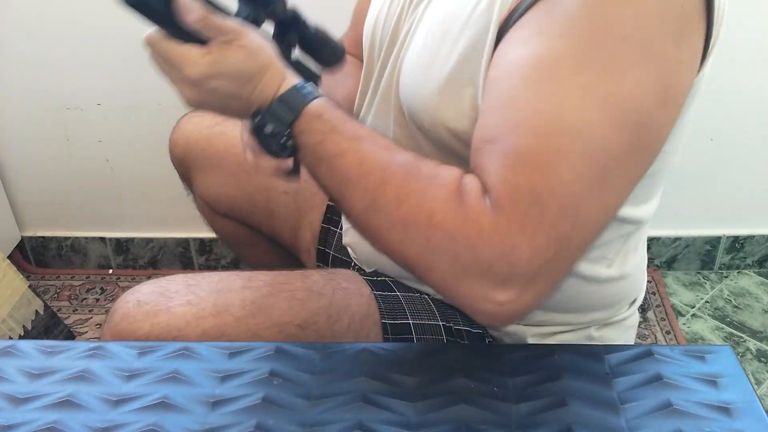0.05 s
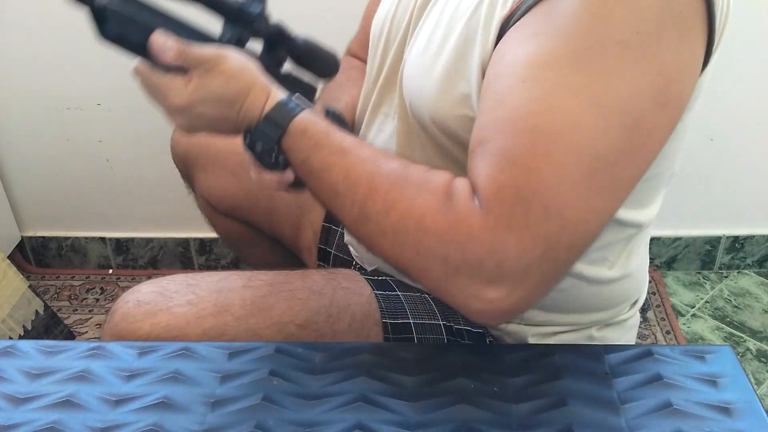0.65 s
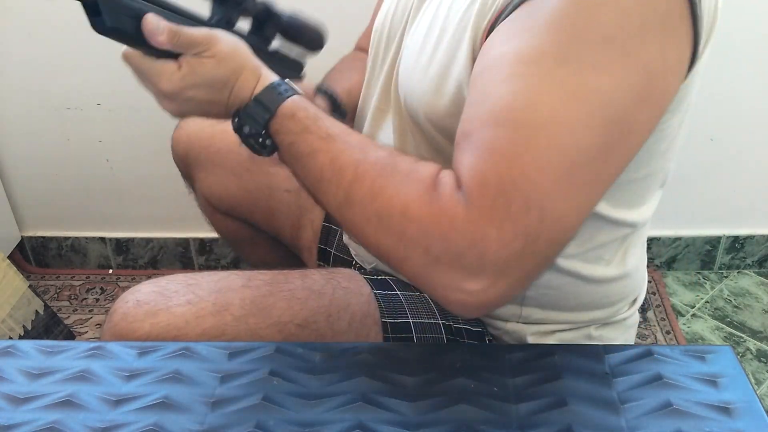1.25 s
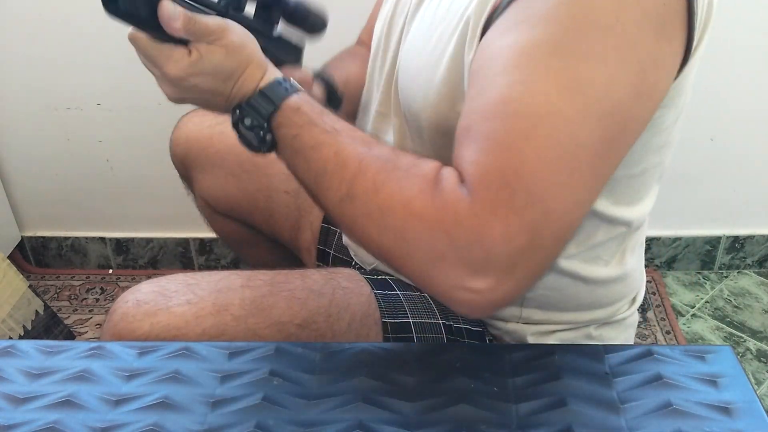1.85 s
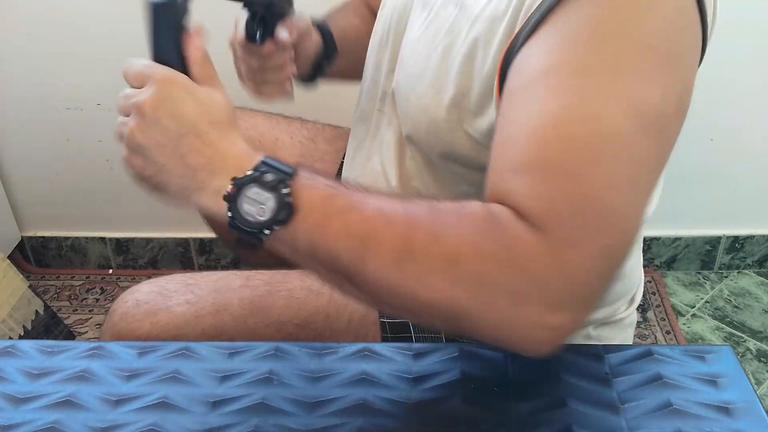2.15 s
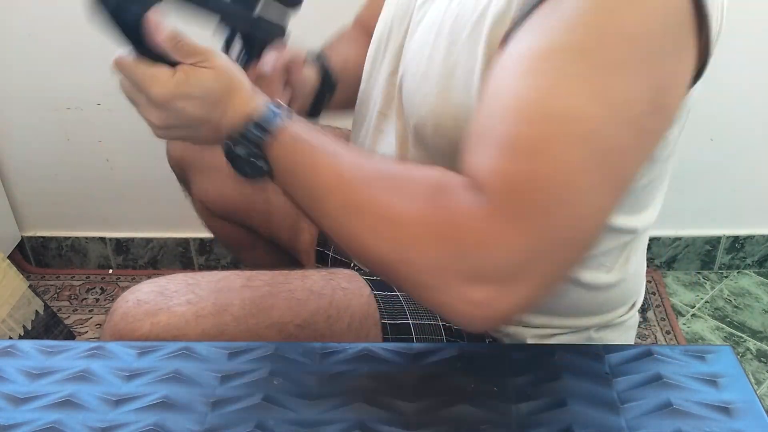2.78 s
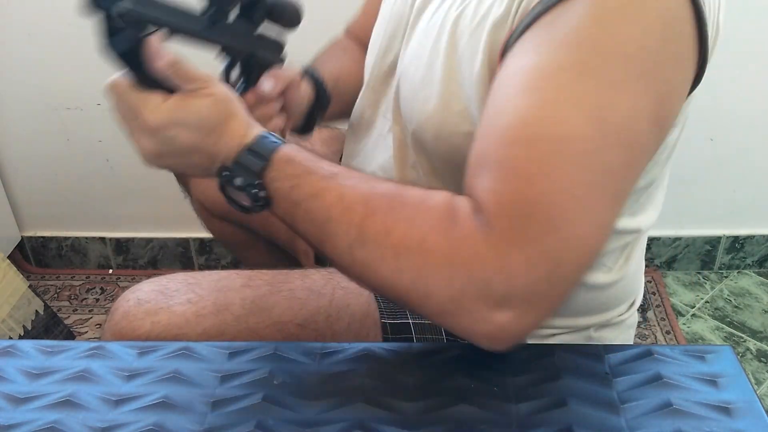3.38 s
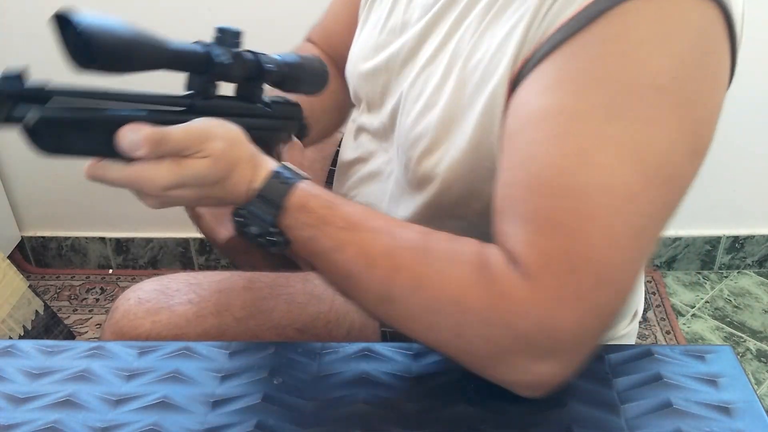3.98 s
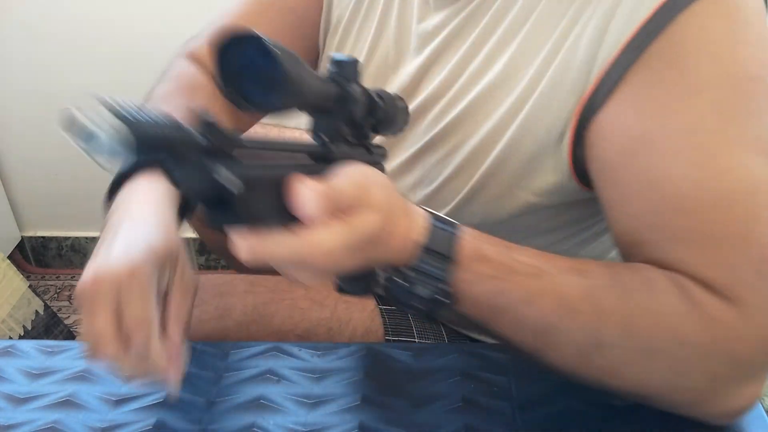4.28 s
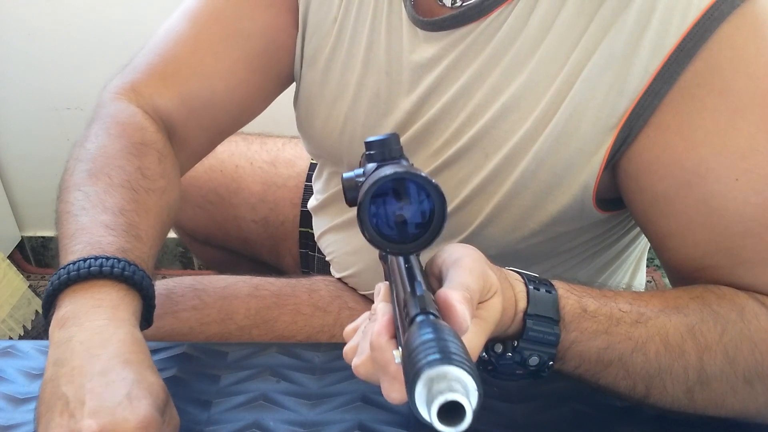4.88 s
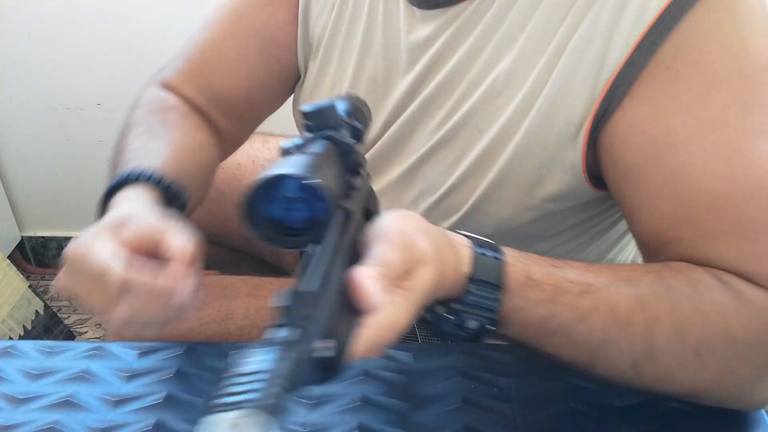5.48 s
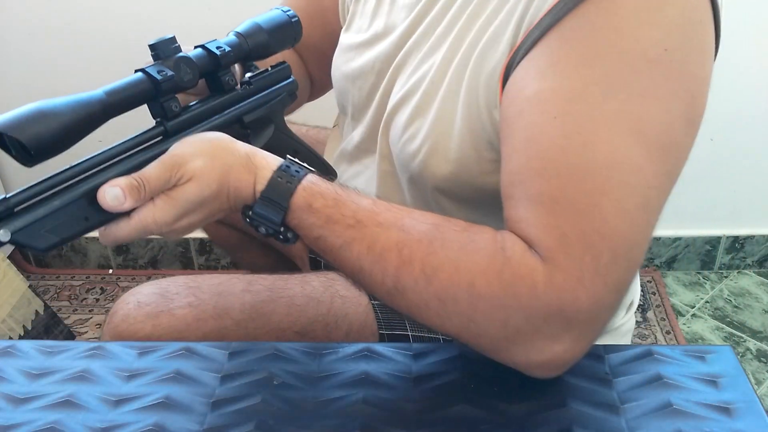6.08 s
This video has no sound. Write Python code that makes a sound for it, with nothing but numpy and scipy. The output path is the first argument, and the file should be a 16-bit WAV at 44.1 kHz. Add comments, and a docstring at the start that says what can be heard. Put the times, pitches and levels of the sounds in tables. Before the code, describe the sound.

The pump lever of an air pistol slams shut seven times, a little under twice a second, each clap sharp, airy and briefly ringing. Lighter metal clicks, faint squeaks and piston sliding fill the gaps, while a table wobbles with a low rumble. The pumping then stops, leaving soft hand bumps, dull grip knocks and cloth rustle. It is heard up close in a small, quiet room with short echoes.

```python
"""Pumping an air pistol

In a small, hard-walled room the pump lever slams shut seven times and swings out to its stop in between.
The valve pops before each slam, the joints click, the piston slides and the table wobbles. Then the
pistol is turned over in the hands, with soft bumps and rustling cloth. A limiter flattens the slams."""
import sys
import numpy as np
from scipy import signal
from scipy.fft import rfft, irfft, next_fast_len
from scipy.io import wavfile
from scipy.ndimage import uniform_filter1d, minimum_filter1d

SR = 44100
rng = np.random.default_rng(int(sys.argv[2]) if len(sys.argv) > 2 else 0)


def output_pcm(signal):
    """Save a mono or channel-first signal as 16-bit PCM at the path in sys.argv[1].

    Samples are clipped to [-1, 1] before scaling.
    """
    pcm = np.clip(np.atleast_2d(signal).T, -1, 1) * 32767
    wavfile.write(sys.argv[1], SR, np.round(pcm).astype(np.int16))


N = 275299
TIME = np.arange(N) / SR
AFTER = TIME[:SR]   # the second after a blow
CUTOFF_HZ = 14280
LEAD_S = .02   # parts scrape for this long before they hit

# The lever slams shut: time_s, level_db, tilt_db_per_octave, knock_db, slide_db, latch_db, wobble_db
SLAMS = [(0.1249, 2.5, 1.5, 2.5, -41, -38.5, -33), (.711, 1, 1, 1, -46, -18.5, -26.5),
         (1.2929, 2, 1, 2, -45, -24.5, -30.5), (1.852, 2, 1, 0, -41.5, -29, -29.5),
         (2.415, 1.5, 1, 2.5, -49.5, -24.5, -39), (2.9734, 1.5, 1, -4, -41, -29.5, -34.5),
         (3.6408, 0.5, 1, 1.5, -54.5, -39.5, -36)]
# The lever hits its open stop: time_s, level_db, tilt_db_per_octave, ring_db, scrape_db, wobble_db
STOPS = [(.427, -28, .5, -2.5, 6, -35.5), (1.028, -26, 1, -16, 1.5, -37.5),
         (1.571, -16, 1.13, -0.5, 1.5, -31), (2.157, -31, 4, -5.5, -8, -40),
         (2.7035, -17, 0.5, -0.5, -1, -35.5), (3.2577, -17, 0, -1.5, -19.5, -37.5)]
# The tone of a small click: pitch_hz, level_db
CLICK_COLOUR = [(100, -26), (450, -19.5), (1300, 0), (2600, 2), (4500, 0.5), (7000, 2), (10500, 6.5),
                (14000, 2.5)]


def amp(db):
    """Turn decibels into a gain."""
    return 10 ** (np.asarray(db) / 20)


def unit(x):
    """Scale a signal to an average power of 1."""
    return x / np.sqrt(np.mean(x ** 2) + 1e-20)


def fade(db, t60):
    """A gain that starts at db and drops 60 dB every t60 seconds."""
    return amp(db - 60 * AFTER / t60)


def onset(rise_s):
    """A gain that climbs smoothly from 0 to 1."""
    return 1 - np.exp(-AFTER / rise_s)


def mode(hz, t60):
    """One vibration that dies away."""
    return np.sin(2 * np.pi * hz * AFTER) * fade(0, t60)


def at_hz(points, hz):
    """Read between the points of a curve, with octaves evenly spaced."""
    known_hz, values = np.transpose(points)
    return np.interp(np.log(hz + 1), np.log(known_hz), values)


def add(track, s, sound):
    """Mix a sound in at s seconds."""
    start = max(0, round(s * SR))
    track[:, start:start + sound.shape[-1]] += sound[..., :N - start]


def in_band(x, hz, width_hz):
    """Keep one band of pitches; white noise keeps its power."""
    band = signal.butter(2, [hz - width_hz / 2, hz + width_hz / 2], "band", fs=SR, output="sos")
    return signal.sosfilt(band, x) * np.sqrt(SR / 2 / width_hz)


def colour(x, spectrum, tilt=0, peaks=()):
    """Shape the tone with a curve, a tilt (dB per octave above 500 Hz) and ringing peaks."""
    size = 2 * next_fast_len(x.shape[-1] // 2 + SR // 10)
    hz = np.arange(size // 2 + 1) * SR / size
    db = at_hz(spectrum, hz) + tilt * np.log2(np.maximum(hz, 500))
    for centre, width, boost in peaks:
        db = db + boost / (1 + (2 * (hz - centre) / width) ** 2)
    gain = amp(db) / np.sqrt(np.mean(amp(db[hz < CUTOFF_HZ]) ** 2))
    # Make the filter ring only after a hit, never before it (minimum phase).
    cepstrum = irfft(np.log(gain))
    cepstrum[1:size // 2] *= 2
    cepstrum[size // 2 + 1:] = 0
    return irfft(rfft(x, size) * np.exp(rfft(cepstrum)))[..., :x.shape[-1]]


def diffuse(size):
    """White noise from all around; left and right differ only in the treble."""
    # Stereo width: pitch_hz, side_to_mid_db
    width = [(100, -58), (2800, -64), (4200, -42.5), (5900, -12), (9000, -8), (13000, -9)]
    mid, side = rng.standard_normal((2, size))
    hz = np.arange(size // 2 + 1) * SR / size
    side = irfft(rfft(side) * amp(at_hz(width, hz)), size)
    return mid + side * [[1], [-1]]


def room_tail(late_db=-21, late_t60=0.58):
    """A fresh wash of echoes from the walls; each band dies at its own rate."""
    # How long the room rings: pitch_hz, t60_s
    decays = [(100, 0.14), (280, 0.28), (600, 0.35), (1400, 0.25), (3500, 0.31), (7000, 0.26), (13000, 0.2)]
    pitches, t60s = np.transpose(decays)
    spectrum = rfft(diffuse(SR))   # one bin per Hz
    late_power = fade(late_db, late_t60) ** 2
    out = 0
    for t60, weights in zip(t60s, np.eye(len(decays))):
        share = at_hz(list(zip(pitches, weights)), np.arange(SR // 2 + 1))
        out = out + irfft(spectrum * share, SR) * np.sqrt(fade(0, t60) ** 2 + late_power)
    return out


def blow(crack_db, crack_t60, scrape_db, scrape_t60, damping_db_per_s=0):
    """Parts scrape together for LEAD_S, crack as they meet, and the room answers."""
    until_hit_s = np.arange(round(LEAD_S * SR), 0, -1) / SR
    scrape = amp(scrape_db - 60 * until_hit_s / scrape_t60) * diffuse(len(until_hit_s))
    ring = fade(crack_db, crack_t60) * diffuse(SR) + room_tail()
    return np.hstack([scrape, ring * amp(-damping_db_per_s * AFTER)])


def struck(x, spectrum, tilt, peaks, uneven_db, count=220):
    """Each blow rings the many small resonances a little differently, the low ones most of all."""
    hz = np.geomspace(40, CUTOFF_HZ, count)
    scatter_db = uneven_db * rng.standard_normal(count) / (1 + (hz / 8000) ** 2)
    return colour(x, np.column_stack([hz, at_hz(spectrum, hz) + scatter_db]), tilt, peaks)


def swell(s, rise_db_per_s, fall_db_per_s, hold_s=0):
    """The gain of one motion: it rises to 1 at time s, holds and dies away."""
    before_s = np.maximum(s - TIME, 0)
    after_s = np.maximum(TIME - s - hold_s, 0)
    return amp(-rise_db_per_s * before_s - fall_db_per_s * after_s)


def friction(gain, spectrum, grain_db, grain_s):
    """Rubbing noise that catches and slips in small grains."""
    grains = np.tanh(unit(uniform_filter1d(rng.standard_normal(N), round(grain_s * SR))))
    return gain * colour(unit(diffuse(N) * amp(grain_db * grains)), spectrum)


def quiet_room(db=-61):
    """A faint, steady rumble and hiss."""
    # The tone of the background: pitch_hz, level_db
    tone = [(20, 2.5), (40, 0), (70, -8.5), (120, -11), (250, -22.5), (500, -27), (1200, -31.5),
            (5000, -39), (14000, -35.5)]
    return amp(db) * colour(diffuse(N), tone)


def arms():
    """Moving arms rub cloth on skin and make a low rumble."""
    # The pumping swing: before_slam_s, length_s, cloth_db, rumble_db
    swing = (0.24, 0.63, -50.5, -60.5)
    # Moves while the pistol is turned: start_s, length_s, cloth_db, rumble_db
    turns = [(3.93, 0.012, -48.5, -59), (4.048, 0.057, -55.5, -54.5), (4.576, .1, -55.5, -55.5),
             (4.704, .01, -54, -51), (4.82, 0.049, -62.5, -57.5), (5.017, 0.17, -67, -57.5),
             (5.51, 0.025, -66.5, -62), (5.679, 0.029, -67.5, -68), (5.882, 0.31, -71, -70)]
    # The tones of the cloth and the rumble: pitch_hz, level_db
    cloth_tone = [(60, -7), (300, -8), (600, -9.5), (1200, -11), (3000, -10), (5000, -9.5), (7500, 2),
                  (10500, 6.5), (12500, 5.5), (14000, -8.5)]
    rumble_tone = [(25, 0.5), (60, 6), (115, 3), (170, -12), (280, -5.5), (400, -12.5), (700, -23.5),
                   (2000, -37), (14000, -59)]
    swings = [(s - swing[0], *swing[1:]) for s, *_ in SLAMS[:-1]]
    cloth = rumble = 0
    for s, length_s, cloth_db, rumble_db in swings + turns:
        cloth += amp(cloth_db) * swell(s, rise_db_per_s=378.5, fall_db_per_s=150, hold_s=length_s)
        rumble += amp(rumble_db) * swell(s, rise_db_per_s=351, fall_db_per_s=142.5, hold_s=length_s)
    rustle = friction(cloth, cloth_tone, grain_db=3.5, grain_s=.009)
    return rustle + friction(rumble, rumble_tone, grain_db=6.5, grain_s=0.051)


def draught():
    """The first slam wafts air onto the microphone: a slow swing of pressure and a low flutter."""
    out = np.zeros((2, N))
    flutter = fade(db=-38, t60=0.5) * in_band(diffuse(SR), hz=75, width_hz=29)
    add(out, SLAMS[0][0], amp(-15) * mode(hz=11, t60=0.57) + flutter)
    return out


def table(wobble_hz=28.5, t60=0.65, delay_s=.005):
    """Each slam, stop and lean rocks the table on its legs and makes its top rumble."""
    # An arm leans on the table: start_s, wobble_db
    leans = [(4.02, -35), (4.58, -42.5), (5.01, -41), (5.84, -54.5)]
    out = np.zeros((2, N))
    low_band = signal.butter(2, [35, 130], "band", fs=SR, output="sos")
    for s, *_, db in SLAMS + STOPS + leans:
        rumble = fade(-26, t60) * unit(signal.sosfilt(low_band, rng.standard_normal(SR)))
        add(out, s + delay_s, amp(db + 4) * onset(0.018) * (mode(wobble_hz, t60) + rumble))
    return out


def faint_rings():
    """Faint, wavering tones swell and fade while the pistol is turned."""
    # The tones: start_s, level_db, pitch_hz, t60_s
    rings = [(5.11, -63, 651, 0.44), (5.67, -74, 4040, 0.67), (5.72, -70.5, 577, 0.52)]
    out = np.zeros((2, N))
    for s, db, hz, t60 in rings:
        tone = in_band(diffuse(SR), hz, width_hz=20 + 0.026 * hz)
        add(out, s, fade(db + 3.5, t60) * onset(0.034) ** 2 * tone)
    return out


def handling():
    """Hands and elbows make soft, padded bumps; the grip gives small dull knocks."""
    # Bumps: start_s, level_db, pitch_hz, t60_s
    bumps = [(3.985, -44, 353, 0.069), (4.026, -27.5, 105.2, 0.084), (4.545, -41, 160.7, 0.097),
             (4.603, -45.5, 84.5, 0.11), (4.709, -45, 117, 0.123), (4.793, -47, 365, 0.26),
             (5.502, -54, 160, 0.16), (5.539, -44, 1002, 0.037), (5.826, -53, 292, 0.077)]
    # Knocks of the grip in the hand: time_s, level_db, tilt_db_per_octave
    knocks = [(4.125, -56.5, -12.5), (4.612, -56.5, -4.5), (4.713, -52, -3), (4.794, -45.5, -5),
              (5.827, -57.5, -2)]
    # The tone of the grip: pitch_hz, level_db
    grip_tone = [(80, 4.5), (400, -6.5), (700, -12), (1200, -7), (2000, -1.5), (3000, -3.5), (4500, -25),
                 (14000, -41)]
    # Where the grip rings: pitch_hz, width_hz, boost_db
    grip_peaks = [(358, 85, 9.5), (724, 200, 15), (1195, 210, 5), (1920, 140, 4)]
    out = np.zeros((2, N))
    for s, db, hz, t60 in bumps:
        overtone = amp(-14) * min(1, 150 / hz) ** 2 * mode(2.4 * hz, t60)
        add(out, s, amp(db + 3.5) * (mode(hz, t60) + overtone) * onset(0.0043))
    for s, db, tilt in knocks:
        knock = blow(crack_db=0, crack_t60=0.12, scrape_db=-20, scrape_t60=0.027)
        add(out, s - LEAD_S, amp(db) * struck(knock, grip_tone, tilt, grip_peaks, uneven_db=2))
    return out


def hinge():
    """The hinge gives a short, dry scrape where a push starts slowly."""
    # Scrapes: start_s, level_db, pitch_hz
    scrapes = [(.046, -39.5, 2200), (3.44, -48, 2101)]
    out = np.zeros((2, N))
    for s, db, hz in scrapes:
        add(out, s, fade(db, t60=.3) * onset(0.003) * in_band(diffuse(SR), hz, width_hz=1100))
    return out


def piston_speed(push_lead_s=.065, pull_delay_s=.165, pull_db=-32):
    """The piston is pushed in before every slam and drawn out after all but the last."""
    pushes = sum(amp(slide_db) * swell(s - push_lead_s, rise_db_per_s=151.5, fall_db_per_s=60)
                 for s, *_, slide_db, _, _ in SLAMS)
    pulls = sum(swell(s + pull_delay_s, rise_db_per_s=170, fall_db_per_s=209.5) for s, *_ in SLAMS[:-1])
    return pushes + amp(pull_db) * pulls


def piston(speed):
    """The piston rubs as it slides, louder the faster it goes."""
    # The tone of the slide: pitch_hz, level_db
    tone = [(100, -17), (450, -27.5), (700, -5.5), (1000, 3), (1400, 3.5), (2000, 0.5), (2500, 6),
            (4200, -0.5), (6500, 2.5), (11000, -4.5), (14000, -11)]
    return friction(speed, tone, grain_db=7, grain_s=0.0039)


def rattle(speed, ticks_per_s=30):
    """Loose pins tick at random while the piston moves."""
    ticks = (rng.random(N) < ticks_per_s / SR) * rng.uniform(0.35, 1, N) * speed
    shape = (1 + fade(db=9, t60=0.015)) * amp(-90 * AFTER)
    tick = colour(room_tail() * shape, CLICK_COLOUR)
    return amp(-5.5) * signal.fftconvolve(ticks[None], tick, axes=1)[:, :N]


def seal(pitch_spread=0.027):
    """The seal squeaks late in each push and twice early in each pull, except on the slow last stroke."""
    # offset_from_slam_s, level_db, pitch_hz, width_hz
    squeaks = [(-.098, -44, 2350, 600), (.125, -37, 1400, 170), (.15, -37, 1400, 170)]
    out = np.zeros((2, N))
    for s, *_ in SLAMS[:-1]:
        for offset_s, db, hz, width_hz in squeaks:
            squeak = in_band(room_tail(), hz * (1 + pitch_spread * rng.standard_normal()), width_hz)
            add(out, s + offset_s, amp(db - 44 * AFTER) * squeak * onset(0.003))
    return out


def click(db, tilt, crack_db, hz):
    """A small part snaps, with a note of its own."""
    snap = blow(crack_db, crack_t60=0.027, scrape_db=0, scrape_t60=0.012, damping_db_per_s=45.5)
    return amp(db) * struck(snap, CLICK_COLOUR, tilt, [(hz, 0.15 * hz, 10)], uneven_db=3.5)


def valve(first_hz=1490, fall_hz_per_stroke=32):
    """The valve ticks and gives a short, hollow pop with an echo, a little lower on every stroke."""
    # Pops, mostly fainter as the pressure builds: start_s, level_db
    pops = [(.097, -22), (.687, -25), (1.268, -31.5), (1.828, -30.5), (2.396, -27.5), (2.946, -34.5),
            (3.617, -36)]
    out = np.zeros((2, N))
    for stroke, (s, db) in enumerate(pops):
        hz = first_hz - fall_hz_per_stroke * stroke
        pop = amp(8) * mode(hz, t60=.017) * onset(0.00016)
        echo = amp(0.5) * in_band(room_tail(), hz, width_hz=600)
        add(out, s, amp(db) * (pop + echo))
        add(out, s - LEAD_S, click(db - 10, tilt=-1.2, crack_db=4, hz=8500))
    return out


def open_stop(tilt, ring_db, scrape_db):
    """The lever drags briefly, then hits its open stop and its steel rings."""
    # The tone of the hit: pitch_hz, level_db
    tone = [(60, -6.5), (250, -18.5), (500, -17), (900, -8), (1500, -4), (2200, -1), (3700, 0.5),
            (4500, -4.5), (7000, -2), (10000, 2), (12000, 1), (14000, -4.5)]
    # Where the steel rings: pitch_hz, width_hz, boost_db (before scaling by ring_db)
    steel = [(1729, 230, 9.5), (2900, 72, 5), (6140, 240, 8.5), (9500, 250, 4.5), (9547, 210, 6.5),
             (10000, 320, 7.5)]
    peaks = [(hz, width, boost * amp(ring_db)) for hz, width, boost in steel]
    hit = blow(crack_db=6, crack_t60=0.18, scrape_db=scrape_db, scrape_t60=.022)
    return struck(hit, tone, tilt, peaks, uneven_db=4)


def slam(tilt, knock_db):
    """The lever claps onto the frame, air spits out, and the tube rings on."""
    # The tone of the clap: pitch_hz, level_db
    tone = [(40, -13), (120, -16.5), (190, -20), (245, -15.5), (330, -7.5), (430, -5.5), (650, 4.5),
            (900, 2), (1500, 4), (2800, 1), (3700, 1), (5200, 0), (6600, -3), (9200, 2.5), (12100, 1.5),
            (13000, -2.5), (14200, -10)]
    # Where the pistol's body rings: pitch_hz, width_hz, boost_db
    body = [(429, 40, 0.5), (551, 16, 0), (634, 30, -1.5), (659, 29, 3), (1000, 29, 1.5), (1100, 15, -2),
            (1390, 20, -0.5), (1440, 20, 3.5), (1611, 7.5, 3), (1750, 23, 5.5), (2200, 7.3, -1),
            (2357, 12, 5.5), (3180, 69, 1.5), (4200, 73, -1), (7535, 120, 3), (9100, 52, -4.5),
            (8760, 130, 6.5), (12400, 120, 8)]
    # The lasting ring of the stock and pump tube: pitch_hz, width_hz, level_db, t60_s
    tube = [(418, 48, -23, 0.17), (585.6, 30, -29, 0.37), (3380, 870, -18.5, 0.31),
            (4080, 760, -13.5, 0.31)]
    hollow_knock = (340, 210, knock_db)   # the stock's knock depends on how it is gripped
    clap = blow(crack_db=-11, crack_t60=0.062, scrape_db=-20, scrape_t60=0.011)
    out = struck(clap, tone, tilt, body + [hollow_knock], uneven_db=0.6)
    spit = fade(db=-4, t60=0.19) * in_band(diffuse(SR), hz=10740, width_hz=5200)
    add(out, LEAD_S, spit)
    for hz, width_hz, db, t60 in tube:
        add(out, LEAD_S, fade(db, t60) * in_band(diffuse(SR), hz, width_hz))
    add(out, LEAD_S, amp(-24) * mode(hz=179, t60=0.047))   # the thump in the palm
    return out


def lever(latch_lead_s=.0135, slack_delay_s=.119):
    """The latch snaps before each slam, the hinge takes up slack after each stop, and the joints click."""
    # Joint clicks, mostly as the lever opens: time_s, level_db, tilt_db_per_octave, crack_db, pitch_hz
    clicks = [(0.035, -36.5, -4, -8, 9400), (.3034, -18, -0.5, 6.5, 13400), (0.9154, -23.5, 0, 8, 1430),
              (1.48, -22, -2.5, 2.5, 12000), (2.025, -27.5, 3.5, -9, 11800),
              (2.0436, -20.5, -0.5, -0.5, 11400), (2.1588, -31.5, 4, 12, 11370), (2.371, -26, 2, 4, 6300),
              (2.3952, -20, 1, 1.5, 9600), (2.611, -22.5, -1, 2.5, 5000), (3.1694, -22, -2, 2, 10900),
              (3.539, -50.5, -1.5, 3, 11000), (3.549, -52, -4.5, 14.5, 3102), (4.1113, -48, 12, 11.5, 8630)]
    out = np.zeros((2, N))
    for s, db, tilt, knock_db, _, latch_db, _ in SLAMS:
        add(out, s - latch_lead_s - LEAD_S, click(latch_db, tilt=0.3, crack_db=3.5, hz=10500))
        add(out, s - LEAD_S, amp(db) * slam(tilt, knock_db))
    for s, db, tilt, ring_db, scrape_db, _ in STOPS:
        add(out, s - LEAD_S, amp(db) * open_stop(tilt, ring_db, scrape_db))
        add(out, s + slack_delay_s - LEAD_S, click(db=-42, tilt=.5, crack_db=2, hz=7300))
    for s, db, tilt, crack_db, hz in clicks:
        add(out, s - LEAD_S, click(db, tilt, crack_db, hz))
    return out


def scene():
    """Mix the pumping, the handling and the quiet room."""
    speed = piston_speed()
    slide = piston(speed)
    background = quiet_room()
    pump = lever() + valve() + seal() + hinge() + rattle(speed) + slide
    return pump + handling() + faint_rings() + table() + draught() + arms() + background


def record(dry, threshold_db=-10, squeeze=0.74, release_db_per_s=170, ceiling=0.84):
    """A fast limiter turns the slams down, a second one catches single peaks, and the top treble is cut."""
    power = uniform_filter1d(np.mean(dry, axis=0) ** 2, size=128)
    level_db = 10 * np.log10(np.maximum(power, 0) + 1e-12)
    cut_db = squeeze * np.maximum(level_db - threshold_db, 0)
    release_db = release_db_per_s * TIME
    held_db = np.maximum.accumulate(cut_db + release_db) - release_db   # cut at once, let go gradually
    limited = dry * amp(-uniform_filter1d(held_db, size=64))
    peak_gain = np.minimum(1, ceiling / (np.abs(limited).max(axis=0) + 1e-9))
    limited = limited * uniform_filter1d(minimum_filter1d(peak_gain, size=9), size=9)
    low_pass = signal.ellip(12, .1, 80, CUTOFF_HZ, fs=SR, output="sos")
    return signal.sosfilt(low_pass, limited)


dry = scene()
out = record(dry)
output_pcm(out)
```